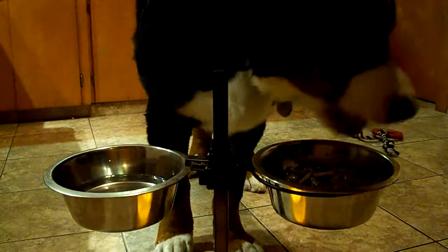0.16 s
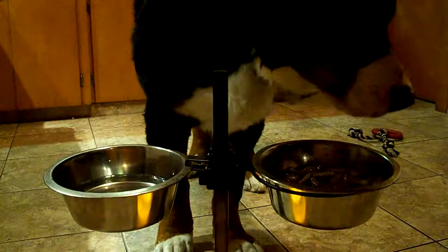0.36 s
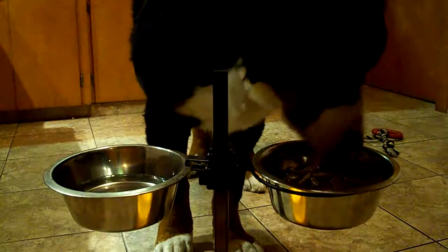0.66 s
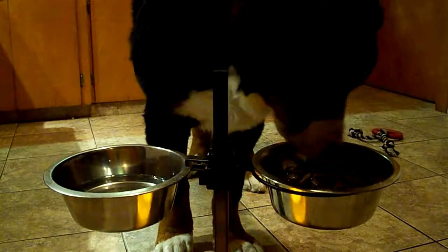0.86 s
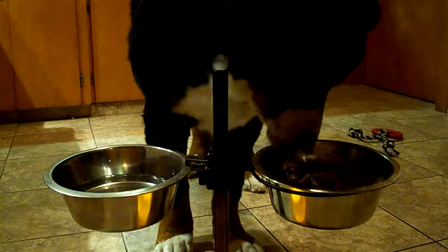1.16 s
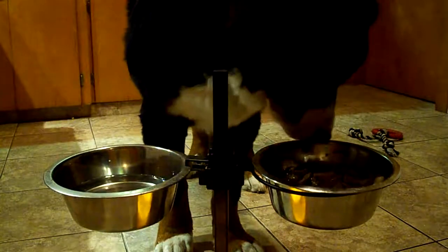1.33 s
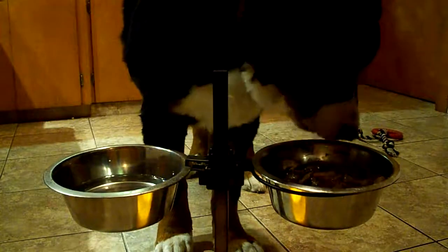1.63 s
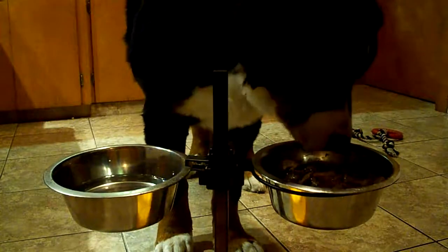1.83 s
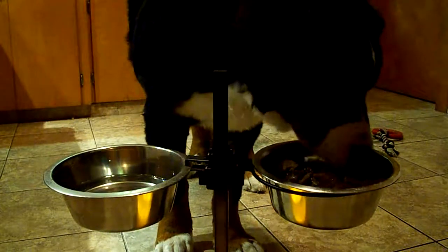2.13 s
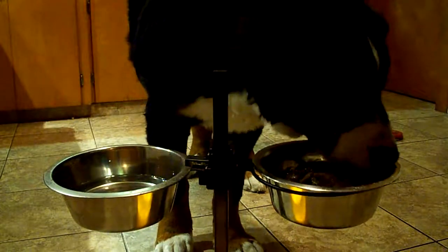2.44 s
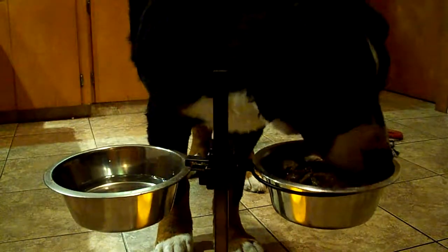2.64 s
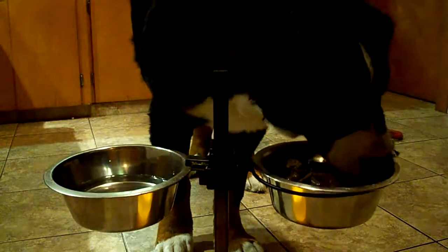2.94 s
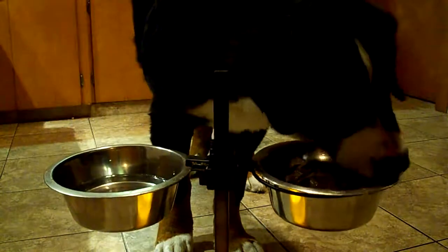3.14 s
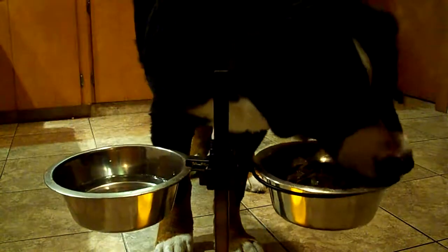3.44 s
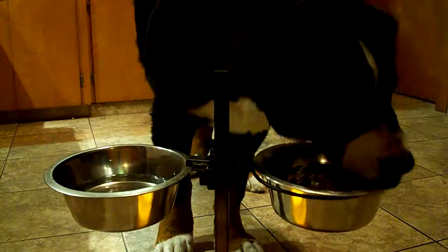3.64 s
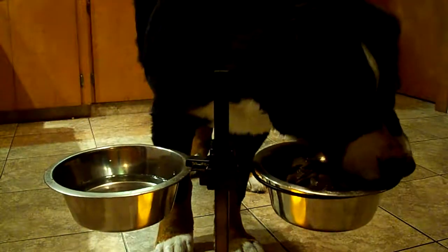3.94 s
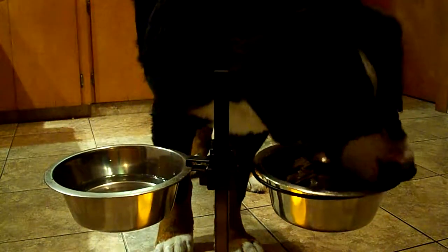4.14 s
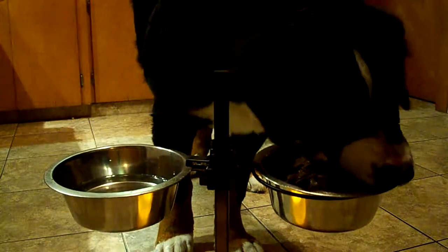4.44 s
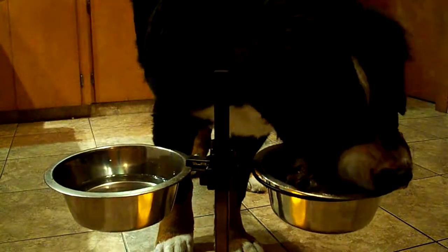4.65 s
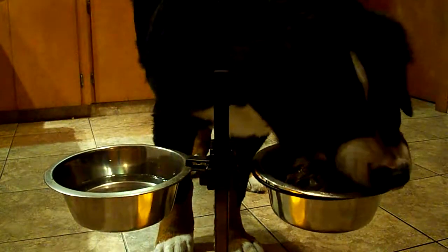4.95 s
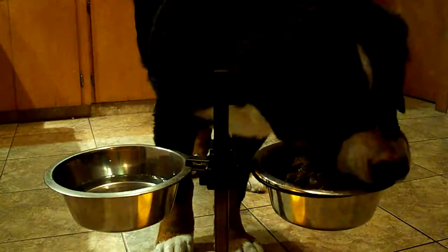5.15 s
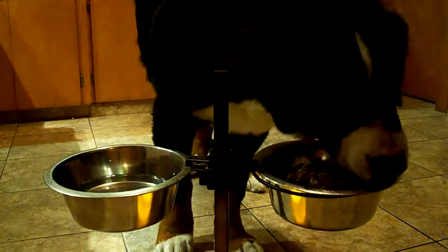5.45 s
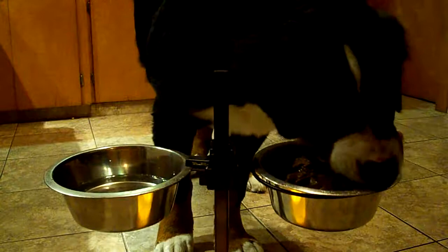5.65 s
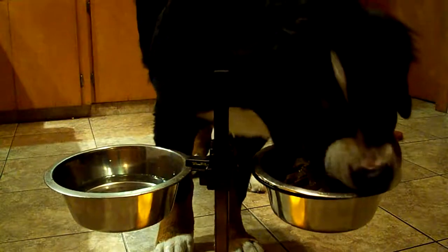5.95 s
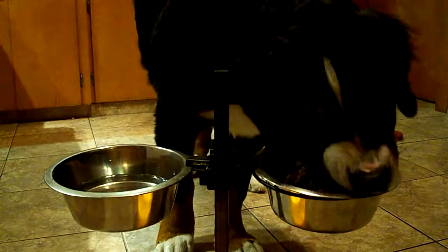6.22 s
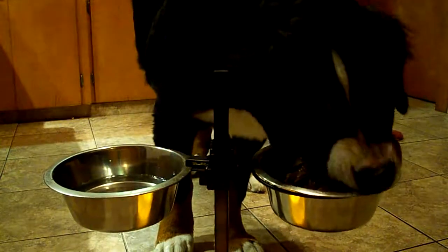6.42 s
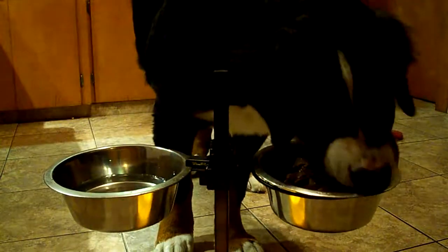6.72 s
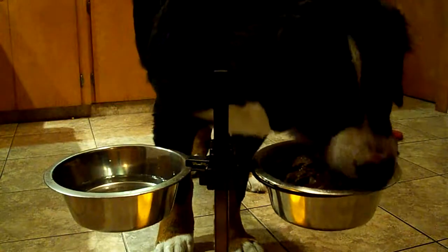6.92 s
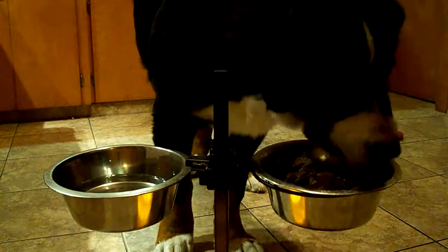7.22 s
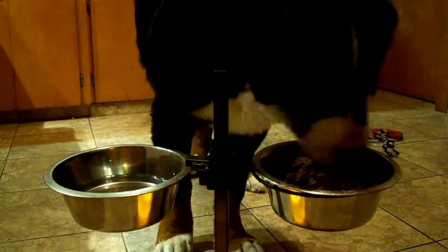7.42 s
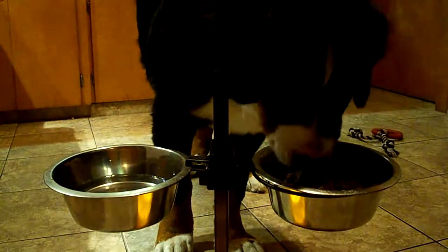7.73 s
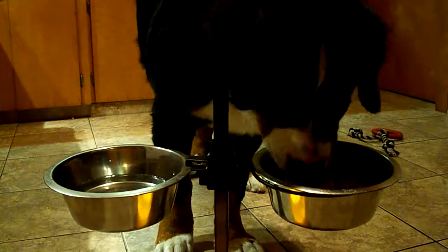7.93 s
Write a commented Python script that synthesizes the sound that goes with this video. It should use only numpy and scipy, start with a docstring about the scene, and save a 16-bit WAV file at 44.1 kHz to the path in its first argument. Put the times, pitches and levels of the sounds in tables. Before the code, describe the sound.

A large dog eats wet food and kibble from a steel bowl, smacking, squelching and clicking close up in a quiet tiled kitchen with a fridge hum.

```python
"""A large dog eats wet food from a steel bowl on a stand in a tiled kitchen, near a small camera.
Tongue, lips, teeth and kibble are short gliding tones with puffs of coloured noise; saliva is random
bubbles and hiss shaped by mouth resonances. The bowl rings faintly and decaying noise tails are the tiles.
Behind: jolts set the floor swaying as the dog shifts its weight, a refrigerator hums on drifting sines,
and filtered noise makes the room tone, a dull late-swelling rustle and a floor tremor."""
import sys
import numpy as np
from scipy import signal
from scipy.fft import rfft, irfft, next_fast_len
from scipy.io import wavfile
from scipy.ndimage import map_coordinates

SR = 44100
rng = np.random.default_rng(int(sys.argv[2]) if len(sys.argv) > 2 else 0)


def inscribe(sig):
    """Save sig as 16-bit PCM at rate SR to the path in sys.argv[1].

    A 1-D sig is mono; a 2-D sig holds one channel per row.
    Samples are clipped to [-1, 1] before scaling.
    """
    pcm = np.round(np.clip(np.atleast_2d(sig).T, -1, 1) * 32767)
    wavfile.write(sys.argv[1], SR, pcm.astype(np.int16))


N = 356328


def amp(db):
    """Gain of a level in dB."""
    return 10 ** (np.asarray(db) / 20)


def unit(x):
    """x scaled to rms 1."""
    return x / np.sqrt(np.mean(x ** 2) + 1e-20)


def along(points, f_hz):
    """(f/Hz, value) points interpolated on a log frequency axis."""
    point_hz, value = np.transpose(points)
    return np.interp(np.log(f_hz + 1), np.log(point_hz + 1), value)


def wobble(knots_per_s):
    """Smooth random curve through unit-variance knots."""
    knots = rng.standard_normal(int(N * knots_per_s / SR) + 4)
    return map_coordinates(knots, [np.arange(N) * knots_per_s / SR])


def filtered(x, response):
    """x times a complex response of frequency."""
    size = next_fast_len(N + SR // 2)
    return irfft(rfft(x, size) * response(np.fft.rfftfreq(size, 1 / SR)), size)[:N]


def resonances(modes):
    """Summed response of (f/Hz, width/Hz, level/dB) band-pass modes of alternating sign."""
    def response(f):
        total = 0
        for k, (f0, width, db) in enumerate(modes):
            total = total + (-1) ** k * amp(db) * 1j * f * width / (f0 * f0 - f * f + 1j * f * width)
        return total
    return response


def noise(spectrum):
    """Noise of rms 1, coloured by (f/Hz, level/dB) points."""
    return unit(filtered(rng.standard_normal(N), lambda f: amp(along(spectrum, f))))


def pops(t_s, db, f_hz, cycles, rise, size):
    """Short tones that swell, glide slightly up as the pocket closes and die within some cycles."""
    t = np.arange(size) / SR
    u = t * (f_hz / cycles)[:, None]
    shape = np.e * 2 * u * np.exp(-2 * u)  # peak 1
    glide = 1 + rise * (np.minimum(u, 2) - .5)
    tone = np.sin(2 * np.pi * f_hz[:, None] * t * glide)
    at = np.round(t_s * SR).astype(int)[:, None] + np.arange(size)
    return np.bincount(at.ravel(), (amp(db)[:, None] * shape * tone).ravel(), N + size)[:N]


CREST_DB = 4  # peak of a puff over its rms


def bursts(t_s, db, f_hz, t60_s, spread_oct):
    """Puffs of lumpy noise, each coloured around its own pitch, with a fainter, longer after-rustle."""
    t = np.arange(4400) / SR
    f = np.fft.rfftfreq(len(t), 1 / SR) + 1
    out = np.zeros(N + len(t))
    decay = amp(-60 * t / t60_s) + amp(-19.0 - 60 * t / (7 * t60_s))
    fade = decay * t / (t + 0.00041) * (1 - t / t[-1])
    grits = rng.standard_normal((len(t_s), len(t)))
    for start, level, centre, grit in zip(t_s, db, f_hz, grits):
        colour = (1 + (np.log2(f / centre) / spread_oct) ** 2) ** 1.1
        grit = unit(irfft(rfft(grit) / colour, len(t)))
        out[round(start * SR):][:len(t)] += amp(level - CREST_DB) * fade * grit
    return out[:N] * amp(2.5 * wobble(500))


# Air pockets under the tongue: [t/s, level/dB, f/Hz, length/cycles]
PLOPS = [(0.128, -25.5, 680, 1.5), (0.234, -44, 736, 3.5), (0.306, -36, 640, 1.4), (0.358, -39.5, 537, 2.1),
         (0.419, -44, 575, 3), (0.515, -37, 636, 1.7), (0.531, -41.5, 564, 3), (0.807, -38.5, 735, 2.7),
         (1.339, -46, 745, 2.1), (1.733, -44.5, 540, 4.2), (2.278, -31, 734, 2), (2.787, -30.5, 690, 1.9),
         (2.82, -43, 760, 4.7), (2.886, -36.5, 780, 2.7), (2.897, -38, 710, 2.2), (3.004, -42, 675, 6.9),
         (3.088, -41, 660, 2.5), (3.155, -26, 610, 2.6), (3.167, -32.5, 610, 4.1), (3.245, -38, 617, 2.5),
         (3.583, -30, 698, 3.2), (3.599, -46, 690, 5.5), (3.643, -38.5, 760, 5.1), (3.915, -42, 790, 3.9),
         (3.924, -34.5, 745, 2.7), (3.946, -33.5, 786, 2.7), (4.041, -46, 760, 3.2), (4.08, -40, 804, 4),
         (4.176, -40, 825, 2.9), (4.354, -44.5, 790, 4.6), (4.727, -41, 780, 4.5), (4.794, -44, 705, 3),
         (4.913, -32, 786, 3.3), (4.989, -34.5, 803, 2.9), (5.975, -41, 784, 6.4), (6.017, -39, 780, 2.9),
         (6.666, -49, 662, 6.5), (7.19, -43.5, 687, 9), (7.304, -41.5, 710, 2.8), (7.521, -40.5, 682, 6.3),
         (7.806, -39.5, 570, 3.4), (7.82, -41, 774, 2.8), (7.829, -36.5, 700, 3.8), (7.967, -47, 780, 4),
         (8.031, -30, 733, 1.6)]


def tongue():
    """Air pockets close under the tongue as low plops."""
    return pops(*np.transpose(PLOPS), rise=0.0047, size=1500)


# Lips parting: [t/s, level/dB, f/Hz, length/cycles, splash re smack/dB]
SMACKS = [(0.128, -36, 1310, 1.5, 2), (0.171, -43, 1490, 4.3, 5), (0.3, -45, 2730, 2.5, 11.5),
          (0.315, -39.5, 2250, 2.8, 7), (0.514, -45, 1180, 3.2, -8), (0.5404, -46, 1720, 6.5, 9),
          (0.7746, -41.5, 3030, 3.4, -16), (1.07, -44.5, 1490, 2.9, 4), (1.17, -41.5, 1730, 8, 6),
          (1.7392, -46, 2330, 3.4, 7.5), (1.768, -50, 1610, 7, -8), (2.0556, -29, 2620, 3.6, -2),
          (2.262, -43.5, 1830, 4.1, -14), (2.3717, -36, 1220, 2.2, 9), (2.55, -36.5, 2470, 2, -6),
          (2.6756, -39.5, 2230, 5.5, -18), (2.724, -38, 1600, 2, 2), (2.7889, -37.5, 1690, 11, 3.5),
          (2.8203, -40, 1780, 4.3, -16), (2.859, -48.5, 1430, 6.4, 7), (2.8848, -41.5, 2940, 5.4, -4),
          (2.898, -41, 1710, 2.8, 3), (2.937, -40.5, 2500, 4.1, -1), (2.9778, -40, 2480, 2.8, -26),
          (3.0677, -50, 1800, 3.3, -19), (3.083, -35, 1720, 4, 4), (3.09, -31, 2900, 7.3, 1.5),
          (3.1068, -31.5, 1630, 3.7, 3), (3.118, -36, 1650, 6.6, -9), (3.155, -29, 1770, 5.3, 8),
          (3.321, -43.5, 1400, 3.8, 10), (3.439, -36, 1675, 5.9, 5), (3.4604, -42, 1730, 3.7, -9),
          (3.5876, -35, 2440, 3.6, -3), (3.604, -39, 2500, 4, -12), (3.61, -37, 1880, 3.5, -8),
          (3.637, -40, 1670, 4.4, -14), (3.7732, -34, 1730, 4.9, -1), (3.913, -44, 1870, 7.5, -6),
          (3.982, -34.5, 2280, 2.5, 0), (4.0791, -43.5, 2020, 7.1, -7), (4.1128, -38.5, 1740, 6.7, -7),
          (4.1765, -34.5, 1740, 2.6, -20), (4.3367, -40, 1980, 4.5, 2), (4.354, -33, 2030, 3.8, -3),
          (4.3694, -50, 2160, 4.4, -13), (4.4822, -46.5, 1670, 3.6, 0), (4.5377, -40.5, 1740, 2.4, -6),
          (4.7263, -30.5, 2580, 3.5, -8), (4.741, -44, 2600, 5.1, -8), (4.787, -39.5, 1970, 3.1, -1),
          (4.796, -40, 1880, 3.2, -2), (4.818, -49, 1500, 4, 5), (4.9121, -37, 1830, 3.3, -14),
          (4.9875, -39.5, 1620, 3.1, 3), (5.628, -42.5, 1740, 4.8, 2), (5.656, -34.5, 1870, 4, -10),
          (5.677, -45, 1750, 5.5, 3), (5.714, -46.5, 1750, 2.2, 9), (5.835, -40, 2960, 11, 0),
          (5.837, -36.5, 1730, 2.5, 2.5), (6.018, -34, 1860, 4.1, -15), (6.0565, -40.5, 1820, 2.7, 7.5),
          (6.558, -38.5, 1800, 4.2, -7.5), (6.6552, -45.5, 1820, 6.4, -3), (6.852, -47, 1680, 3.7, 2),
          (6.9505, -29, 1725, 3.4, -5.5), (6.9649, -49, 1720, 3.2, -9), (7.241, -48, 2250, 3.5, 6),
          (7.2945, -44, 1830, 6.9, 1), (7.296, -46, 2580, 3.6, -2), (7.52, -48, 2400, 4, -6),
          (7.521, -41.5, 1074, 4.3, -3), (7.766, -44, 1260, 3, -5), (7.807, -39.5, 1370, 2.3, 3),
          (7.83, -37.5, 1440, 2.7, 4.5), (7.968, -45, 3220, 3.5, -9), (8.031, -43, 1580, 12, 4)]
DROOL_DB = -20  # re smack


def lips():
    """Parting lips pop, splash spit and leave a ragged sputter near the pitch of the smack."""
    t_s, db, f_hz, cycles, splash_db = np.transpose(SMACKS)
    smacks = pops(t_s, db, f_hz, cycles, rise=0.0056, size=700)
    splash = bursts(t_s, db + splash_db, 0.95 * f_hz, 0.017, spread_oct=0.94)
    drool = bursts(t_s, db + DROOL_DB, 1.06 * f_hz, 0.18, spread_oct=0.22) * amp(5 * wobble(150))
    return smacks + splash + drool


# Kibble on teeth and steel: [t/s, level/dB, f/Hz, crack re ring/dB]
TICKS = [(0.1095, -42, 3650, 3), (0.1287, -33.5, 4100, 4), (0.171, -34.5, 4770, 5.5),
         (0.232, -38, 7100, 11.5), (0.304, -46, 6560, 2), (0.3117, -37, 5900, -7), (0.529, -44.5, 5000, -1),
         (0.54, -41, 5100, 0), (0.7745, -41.5, 3920, -10), (1.178, -41.5, 3560, 7.5),
         (1.2388, -36, 5530, -3), (1.301, -49, 3580, 8), (1.5332, -45.5, 4560, 6),
         (1.6114, -46.5, 4650, 10.5), (1.6366, -44, 5240, 7), (1.657, -46, 3950, 1), (1.967, -46, 6800, 7),
         (2.0521, -41, 3480, -4), (2.129, -46, 4000, -2), (2.2845, -42, 6000, -2), (2.3716, -41, 3530, -12),
         (2.66, -39.5, 4880, -4), (2.7326, -36.5, 5160, 10.5), (2.826, -37.5, 4250, 3),
         (2.9244, -37.5, 6040, 3), (3.088, -32, 6900, 9), (3.0913, -26.5, 5560, 9), (3.1533, -35, 5000, 2),
         (3.4131, -34, 3760, -12), (3.4388, -33.5, 3800, 13), (3.605, -23.5, 5300, -15),
         (3.618, -37, 5530, -5), (3.688, -38, 7430, -1), (3.758, -45.5, 4080, 5),
         (3.7758, -37.5, 3800, 11.5), (3.927, -46, 4320, -2), (3.9456, -33.5, 5000, 7),
         (4.036, -42.5, 3550, 7), (4.078, -39.5, 3640, 5.5), (4.088, -37, 4080, 0),
         (4.113, -38.5, 4440, 13), (4.1741, -36, 7300, 11.5), (4.2125, -41, 5950, 2),
         (4.352, -44, 3650, -3), (4.484, -43.5, 5500, 8), (4.5375, -38.5, 6900, 10.5),
         (4.7251, -39.5, 3890, -12), (4.8991, -36, 5770, -2), (4.9127, -35, 7640, 8),
         (4.9874, -40.5, 7300, 16.5), (5.199, -41.5, 5100, 1), (5.2873, -42, 5500, 3),
         (5.5493, -32, 4100, 2.5), (5.6486, -36.5, 4950, 5.5), (5.715, -43, 6650, 3),
         (5.793, -42.5, 3910, 7.5), (5.824, -45, 3800, 0), (5.837, -36.5, 4950, 9),
         (6.0575, -42, 3470, 7.5), (6.155, -43.5, 4630, 5), (6.614, -47.5, 4180, -1),
         (7.1279, -42.5, 3980, -3), (7.184, -39.5, 7430, 7), (7.448, -55, 3980, 12),
         (7.8272, -47, 4400, -2), (7.892, -52, 5070, -2), (7.9253, -43, 4100, 6), (8.003, -50, 4500, -3),
         (8.0118, -41.5, 4250, -5)]
# Air between muzzle and bowl: [f/Hz, width/Hz, level/dB]
HOLLOW = [(1750, 140, -8.5), (3750, 170, 8.5), (5260, 400, -9), (7420, 500, 7)]


def ticks():
    """A hard contact: a brief high ring and a broad crack that also rings the hollow of the bowl."""
    t_s, db, f_hz, crack_db = np.transpose(TICKS)
    ring = pops(t_s, db, f_hz, np.full(len(t_s), 5.), rise=0.02, size=300)
    crack = bursts(t_s, db + crack_db, 1.36 * f_hz, 0.013, spread_oct=1.0)
    return ring + crack + filtered(crack, resonances(HOLLOW))


# Jaw squeezing wet food: [t/s, squelch level/dB, fizz level/dB, t60/s]
CHEWS = [(0.14, -65, -68, 1.05), (0.31, -66, -55.5, 0.38), (0.55, -61, -58, 0.26), (0.8, -56, -59.5, 0.63),
         (1.169, -51, -53.5, 0.18), (1.32, -55, -77, 0.48), (1.63, -58, -54.5, 0.3), (1.73, -54, -64, 0.27),
         (2.06, -57, -62.5, 1.5), (2.281, -51, -52.5, 0.12), (2.38, -56.5, -61.5, 1.4),
         (2.55, -52, -58.5, 0.83), (2.74, -52, -50, 1.06), (2.8, -48.5, -63, .3), (2.89, -45, -57, 0.17),
         (3.092, -43.5, -42, 0.36), (3.16, -50, -53, 1.7), (3.33, -52.5, -53, 0.24), (3.44, -56, -48, 0.26),
         (3.601, -47.5, -48, 0.3), (3.78, -53.5, -52.5, 0.36), (3.92, -52.5, -54, 0.65),
         (4.11, -52, -53, 0.83), (4.359, -57, -55, 0.32), (4.73, -67, -58.5, 0.94), (5.65, -54, -66, 0.87),
         (5.84, -58.5, -50, 0.41), (6.019, -50.5, -61, 0.2), (6.27, -54.5, -60, 0.53), (6.56, -57, -66, .4),
         (6.66, -62, -61, 0.64), (6.96, -50, -71, 0.23), (7.2, -57, -63, 0.23), (7.3, -64, -72, 0.17),
         (7.76, -51.5, -59, 0.42), (7.83, -64, -56.5, 0.28), (7.92, -54, -55, 0.35),
         (8.031, -46.5, -55, 0.24)]
SQUEEZE_S = 0.11  # time to climb 60 dB
IDLE_SQUELCH_DB, IDLE_FIZZ_DB = -65.5, -66.5  # floor under the chews


def chewing():
    """Gains of squelch and fizz: each chew climbs and drains exponentially; powers add."""
    t = np.arange(N) / SR
    power = amp([[IDLE_SQUELCH_DB], [IDLE_FIZZ_DB]]) ** 2 * np.ones(N)
    for start, squelch_db, fizz_db, t60_s in CHEWS:
        fall_db = -60 * np.where(t < start, (start - t) / SQUEEZE_S, (t - start) / t60_s)
        power = power + amp([[squelch_db], [fizz_db]]) ** 2 * amp(2 * fall_db)
    return np.sqrt(power)


# Mouth cavity and bowl air: [f/Hz, width/Hz, level/dB]
MOUTH = [(664, 210, 3), (1930, 640, -0.5), (2570, 1220, -1), (5000, 7300, -7.5)]


def saliva():
    """Tiny bubbles burst at random in the mouth's resonances; above them a finer fizz."""
    squelch_gain, fizz_gain = chewing()
    when, pitch, size = rng.random((3, 6000))
    bubble_db = -2.2 * np.log(size + 0.028)
    bubble_hz = 2600 * 2 ** (3.2 * (pitch - .5))
    bubbles = pops(when * (N - 1) / SR, bubble_db, bubble_hz, np.full(len(when), 2.2), rise=0.091, size=300)
    hiss = amp(-2.5 + 3.1 * wobble(40)) * rng.standard_normal(N)
    spit = unit(bubbles) + hiss
    mouth = resonances(MOUTH)
    squelch = unit(filtered(spit, lambda f: mouth(f) ** 2 / (1 + (f / 3000) ** 4)))
    ragged = spit * amp(5.6 * wobble(150))
    fizz = unit(filtered(ragged, lambda f: mouth(f) / (1 + (3000 / (f + 1)) ** 4)))
    return squelch_gain * squelch + fizz_gain * fizz


CRUMBS_PER_S, CRUMB_DB = 700, -5  # level re fizz


def crumbs():
    """Kibble fragments break as dry cracks of many pitches that follow the fizz gain of the jaw."""
    when, pitch, size = rng.random((int(CRUMBS_PER_S * N / SR), 3)).T
    crack_db = -4.5 * np.log(size + 0.0043)
    crack_hz = 3300 * 2 ** (2.6 * (pitch - .5))
    cracks = pops(when * (N - 1) / SR, crack_db, crack_hz, np.full(len(when), 3.), rise=0.031, size=200)
    return amp(CRUMB_DB) * chewing()[1] * unit(cracks)


# Muzzle bumping the bowl on its stand: [t/s, level/dB, f/Hz, length/cycles]
THUDS = [(0.127, -30, 227, 1.1), (0.14, -42.5, 395, 4), (0.305, -44, 227, 3.1), (0.353, -48.5, 333, 3.9),
         (0.539, -48, 477, 11), (1.728, -43, 187, 1.1), (3.085, -40, 180, 1.3), (3.154, -44, 163, 2.6),
         (4.174, -44.5, 174, 3), (4.911, -39, 360, 2.5), (4.928, -45, 306, 1.7), (4.988, -40.5, 393, 3.2),
         (5.004, -55, 460, 8.4), (7.798, -48, 168, 2.7)]


def bowl():
    """Food damps the steel: a bump is a dull thud of a few cycles with a puff of noise."""
    t_s, db, f_hz, cycles = np.transpose(THUDS)
    thuds = pops(t_s, db, f_hz, cycles, rise=0.0033, size=3000)
    return thuds + bursts(t_s, db + 4.5, 1.25 * f_hz, 0.063, spread_oct=0.88)


# Faint ring of the bowl: [f/Hz, width/Hz, level/dB]
STEEL = [(723, 80, -14), (1910, 6.4, -13.5), (2580, 38, -9.5), (3750, 11, -8.5), (4930, 16, -12.5),
         (6330, 50, -9)]
WET_DRIVE_DB, HARD_DRIVE_DB = -1.0, 2  # hard contacts drive the steel more


def steel(wet, hard):
    """Every sound over the bowl drives its steel modes a little."""
    return filtered(amp(WET_DRIVE_DB) * wet + amp(HARD_DRIVE_DB) * hard, resonances(STEEL))


# Reverberation of the kitchen: [f/Hz, t60/s]
KITCHEN = [(300, 0.27), (1500, 0.28), (4000, 0.29), (8000, 0.39)]


def kitchen(x):
    """Tiles and cupboards answer 5 ms late; the head moves, so each quarter second meets a new tail."""
    out, step = np.zeros(N + SR), SR // 4
    for start in range(0, N, step):
        f, t, z = signal.stft(rng.standard_normal(SR // 3), SR, nperseg=256)
        decay = amp(-60 * t / along(KITCHEN, f)[:, None])
        tail = signal.istft(z * decay, SR, nperseg=256)[1]
        answer = signal.fftconvolve(x[start:start + step], tail / np.linalg.norm(tail))
        out[start + 220:][:len(answer)] += answer
    return out[:N]


# Dog shifting its weight: [t/s, level/dB]
JOLTS = [(0.105, -27), (0.56, -26), (1.045, -26.5), (1.49, -27.5), (2.037, -35.5), (2.503, -28.5),
         (3.089, -27), (3.84, -46), (4.94, -42.5)]
# Floor modes under the camera: [f/Hz, level re jolt/dB, t60/s]
BOARDS = [(12.33, 5, 0.9), (16.52, -8.5, 1.5), (23.4, -8.5, 1.7)]
SHOVE_S, SCATTER_DB = 0.019, 3.8  # onset time constant; random spread of each mode's level


def sway():
    """Each jolt sets the floor's damped modes swinging for a few cycles."""
    t = np.arange(2 * SR) / SR
    out = np.zeros(N + len(t))
    scatters = rng.normal(0, SCATTER_DB, (len(JOLTS), len(BOARDS)))
    for (start, db), scatter in zip(JOLTS, scatters):
        swing = np.zeros(len(t))
        for (f_hz, mode_db, t60_s), offset_db in zip(BOARDS, scatter):
            swing += amp(mode_db + offset_db - 60 * t / t60_s) * np.sin(2 * np.pi * f_hz * t)
        out[round(start * SR):][:len(t)] += amp(db) * (1 - np.exp(-t / SHOVE_S)) * swing
    return out[:N]


# Unsteady motor tones: [f/Hz, frequency drift/Hz, rms level/dB]
MOTOR = [(58.4, 3.47, -53.5), (171.9, 3.01, -59)]
HUM_HZ, HUM_DB = 119.5, -48.5  # settled rms level
HUM_SHORT_DB, HUM_SETTLE_S = 11.5, 1.48  # initial shortfall and its time constant


def refrigerator():
    """A hum that grows into its level, and two tones fuzzy from random frequency drift."""
    t = np.arange(N) / SR
    hum_db = HUM_DB - HUM_SHORT_DB * np.exp(-t / HUM_SETTLE_S) + 0.32 * wobble(5)
    out = np.sqrt(2) * amp(hum_db) * np.sin(2 * np.pi * HUM_HZ * t)
    for f_hz, drift_hz, db in MOTOR:
        phase = 2 * np.pi * np.cumsum(f_hz + drift_hz * wobble(8)) / SR
        out = out + np.sqrt(2) * amp(db + 1.6 * wobble(7)) * np.sin(phase)
    return out


# Rustle level: [t/s, level/dB]
DRONE = [(0, -58.5), (1, -67), (5.3, -67.5), (6, -65), (7.2, -63), (8.08, -60)]
# Rustle colour: [f/Hz, relative level/dB]
DULL = [(120, -38), (230, -5.5), (340, 2), (480, -4.5), (900, -41)]


def rustle():
    """Dull low-mid noise that flutters and swells late."""
    level_db = np.interp(np.arange(N) / SR, *np.transpose(DRONE)) + 3 * wobble(12)
    return amp(level_db) * noise(DULL)


# Colour of room tone and microphone hiss: [f/Hz, relative level/dB]
AIR = [(14, -26.5), (24, -5.5), (34, -7), (49, -6.5), (76, -12.5), (131, -16), (262, -23.5), (548, -27),
       (702, -27), (1360, -35), (1750, -34.5), (3310, -39), (7290, -42), (8040, -38.5), (8660, -68),
       (11300, -103), (19100, -120)]
AIR_DB = -48.5


def room_tone():
    """Room rumble and hiss: coloured noise of slightly wandering level."""
    return amp(AIR_DB + 1.48 * wobble(2.06)) * noise(AIR)


# Colour of the floor tremor: [f/Hz, relative level/dB]
FLOOR = [(2, -51.5), (5, -21), (7, -12), (12, 7), (16, -7), (21, -12.5), (28, -12.5), (40, -37.5),
         (70, -120)]
TREMOR_DB = -47.5


def tremor():
    """The floor trembles faintly: very low noise of wandering level."""
    return amp(TREMOR_DB + 2.0 * wobble(2)) * noise(FLOOR)


def scene():
    """The dog close by, its echo, and the kitchen's background."""
    wet = tongue() + lips() + bowl() + saliva()
    hard = ticks() + crumbs()
    near = wet + hard + steel(wet, hard)
    echo = amp(-6.0) * kitchen(near)
    background = sway() + refrigerator() + rustle() + room_tone() + tremor()
    return (near + echo + background)[None]


TOP_HZ, OFFSET = 8780, -.0109  # band limit; DC


def record(dry):
    """The camera rolls off near its band limit, keeps nothing above and adds a small offset."""
    def response(f):
        rolloff_db = -40 * np.clip((f - 7700) / 1150, 0, 1) ** 1.26
        return amp(rolloff_db) * (f < TOP_HZ)
    return (filtered(dry[0], response) + OFFSET)[None]


dry = scene()
out = record(dry)
inscribe(out)
```